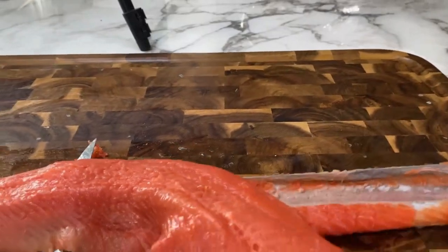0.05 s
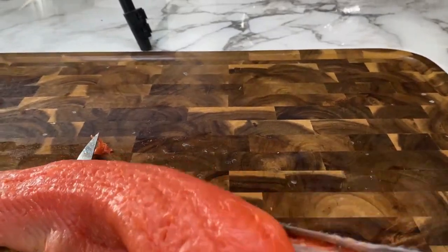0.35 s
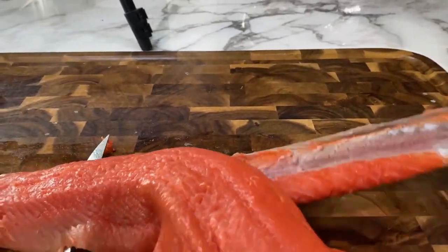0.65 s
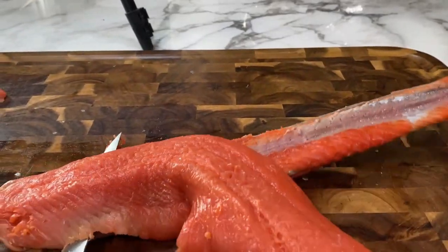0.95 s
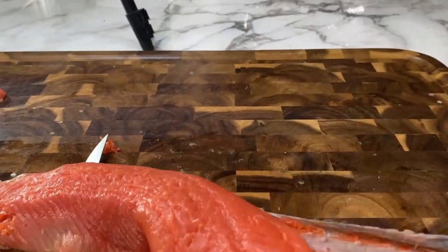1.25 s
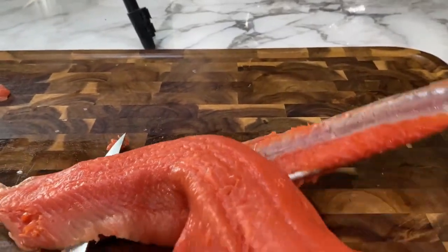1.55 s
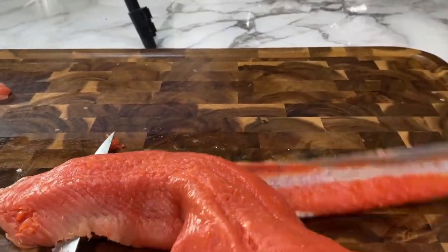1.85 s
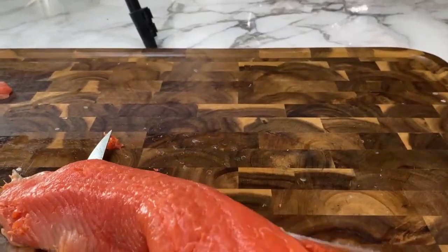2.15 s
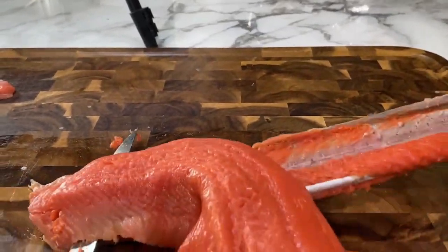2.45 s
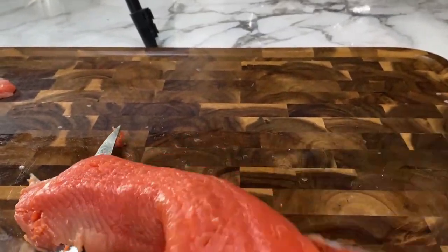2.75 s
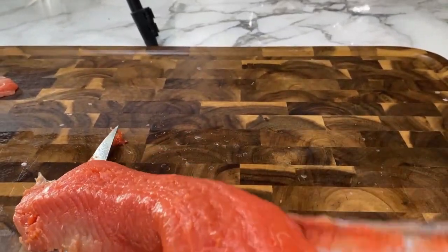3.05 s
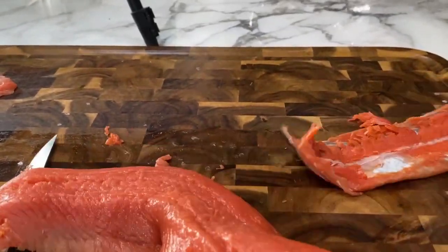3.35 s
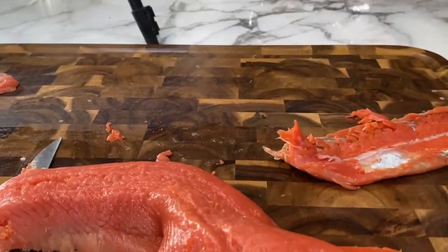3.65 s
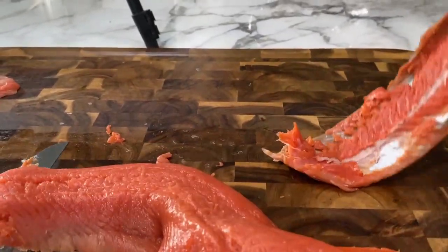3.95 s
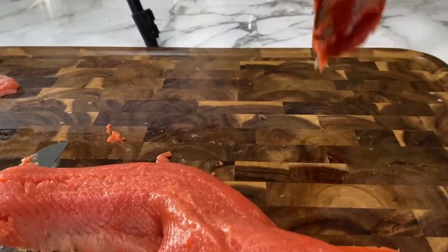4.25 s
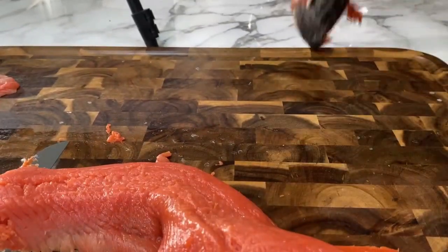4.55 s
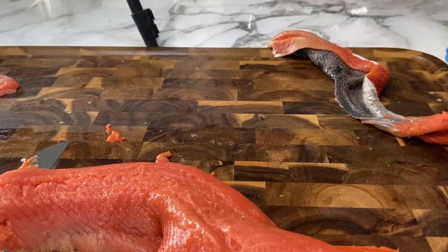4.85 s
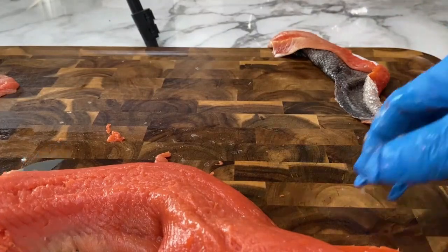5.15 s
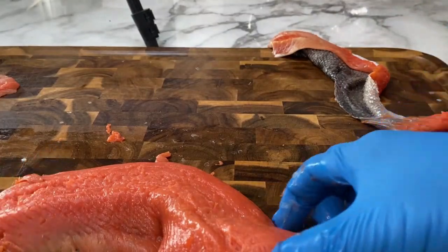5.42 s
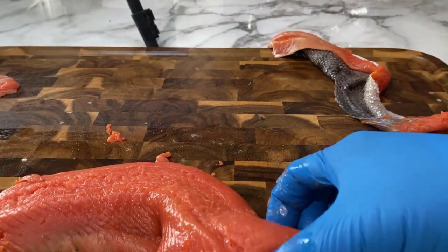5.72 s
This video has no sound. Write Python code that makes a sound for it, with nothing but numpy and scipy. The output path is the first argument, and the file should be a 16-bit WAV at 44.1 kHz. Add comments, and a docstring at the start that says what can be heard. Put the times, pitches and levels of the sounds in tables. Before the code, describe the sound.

A microphone sits close to a wooden cutting board in a kitchen, with a fan's low, steady rush behind and a slight room echo. From the start, salmon skin is rocked against a knife in soft, uneven strokes: wet fibres crackle and squelch, juice pops, and the board rumbles dully. Sharper little tears come at about 1.5 and 2.3 seconds. From 3.1 to 3.6 seconds the last strip rips free, louder and sizzling. A lull follows. At about 4.7 seconds, after a few wet pops, the skin lands with a sharp slap, the loudest sound, and a quickly fading fizz. The steel blade slides lightly around 5 seconds and gives a short ringing scrape at 5.2. A gloved hand squelches softly on the flesh near 5.5 seconds, and the knife clicks twice in quick succession against the board at 5.7.

```python
"""A kitchen, one microphone close to a wooden board. A salmon skin is rocked against a knife: wet
fibres part in strokes, juice pops, and the last strip rips free. The skin is dropped with a slap and
a fading fizz; the steel blade scrapes briefly and clicks twice as it is handled.
A fan runs behind it all, and farther off the walls answer softly."""
import sys
import numpy as np
from scipy import signal
from scipy.fft import rfft, irfft, next_fast_len
from scipy.io import wavfile
from scipy.ndimage import map_coordinates

SR = 44100
rng = np.random.default_rng(int(sys.argv[2]) if len(sys.argv) > 2 else 0)


def wav_record(signal):
    """Record a signal, one row per channel, as 16-bit PCM in the file named by sys.argv[1]."""
    frames = np.transpose(np.atleast_2d(signal))
    bounded = np.clip(frames, -1, 1)
    # unit amplitude maps onto the largest positive 16-bit level
    quanta = np.round(bounded * 32767).astype(np.int16)
    wavfile.write(sys.argv[1], SR, quanta)


N = 254898
TOP_HZ = 15950  # upper edge of the band
TYPICAL_DB = -41.5  # a typical stroke
# the hands first lean on the board: t/s, level/dB, rise/s, hold/s, fade/s
LEANING = (0.1, -46, -7, 0.5, 0.15)


def amp(db):
    """Decibels to gain."""
    return 10 ** (np.asarray(db) / 20)


def unit(x):
    """Scale to rms 1."""
    return x / np.sqrt(np.mean(x ** 2) + 1e-20)


def along(points, hz):
    """Read (f/Hz, value) points on a log frequency axis."""
    f, v = np.transpose(points)
    return np.interp(np.log(hz + 1), np.log(f + 1), v)


def wobble(rate):
    """A smooth random curve, rate knots a second."""
    knots = rng.standard_normal(int(N * rate / SR) + 4)
    return map_coordinates(knots, [np.arange(N) * rate / SR])


def swell(s, db, rise, hold, fade, depth_db=20.5):
    """Gain that climbs to db at time s, holds and fades; one rise or fade time covers depth_db."""
    t = np.arange(N) / SR - s
    away = np.maximum(-t / rise, 0) + np.maximum((t - hold) / fade, 0)
    return amp(db - depth_db * np.minimum(away, 6) ** 1.05)


def filtered(x, response):
    """x through a complex response of frequency."""
    size = next_fast_len(len(x) + 8192)
    return irfft(rfft(x, size) * response(np.fft.rfftfreq(size, 1 / SR)), size)[:len(x)]


def coloured(x, spectrum):
    """x shaped by (f/Hz, level/dB) points, at rms 1."""
    return unit(filtered(x, lambda hz: amp(along(spectrum, hz))))


def resonant(x, peaks):
    """x through (f/Hz, width/Hz, level/dB) resonances."""
    return filtered(x, lambda f: sum(amp(db) * 1j * f * width / (hz * hz - f * f + 1j * f * width)
                                     for hz, width, db in peaks))


def causal(x, spectrum, size=2048):
    """x through a minimum-phase filter of energy 1, shaped by (f/Hz, level/dB) points."""
    cepstrum = irfft(np.log(amp(along(spectrum, np.fft.rfftfreq(size, 1 / SR)))))
    fold = np.r_[1, np.full(size // 2 - 1, 2), np.zeros(size // 2)]
    response = irfft(np.exp(rfft(cepstrum * fold)))
    return signal.fftconvolve(x, response / np.linalg.norm(response))[:len(x)]


def add(track, s, sound):
    """Mix a sound into the track at time s."""
    part = track[round(s * SR):][:len(sound)]
    part += sound[:len(part)]


def strew(grains, when):
    """Mix each row of grains in at its fraction of the scene's length, at rms 1."""
    where = (when * N).astype(int)[:, None] + np.arange(grains.shape[1])
    return unit(np.bincount(where.ravel(), grains.ravel(), N)[:N])


def fan():
    """The fan behind the board: a low rush of air, a hiss and a thin whine."""
    # spectra of the moving air: f/Hz, level/dB
    rush_spectrum = [(20, -50), (33, -29), (43, -8), (76, -1), (130, -2.5), (172, 1), (205, -1.5),
                     (240, -1), (400, -4.5), (470, -5), (660, -11), (880, -16), (1100, -25), (2000, -51)]
    hiss_spectrum = [(500, -15), (1000, 2), (1700, 0.5), (2500, -6.5), (4000, -9), (6000, -11),
                     (10000, -15.5), (13000, -25), (16000, -34)]
    rush = amp(-47.5) * coloured(rng.standard_normal(N), rush_spectrum)
    hiss = amp(-59.5) * coloured(rng.standard_normal(N), hiss_spectrum)
    whine = amp(-69) * unit(resonant(rng.standard_normal(N), [(4400, 130, 0)]))
    return rush + hiss + whine


def pull():
    """Strength of the pull on the skin and of its sizzle; overlapping strokes add in power."""
    # rocking on the knife, the last rip (3.2 s), skin dragged off (from 3.7 s), glove on flesh (5.4 s):
    # t/s, level/dB, rise/s, hold/s, fade/s, sizzle re level/dB
    strokes = [ (0.01, -50.5, 0.1, 0.016, 0.14, -10), (0.289, -51.5, 0.05, 0.085, 0.17, -1.5),
               (0.594, -49.5, 0.17, 0.029, 0.16, -0.5), (0.719, -44, 0.017, 0.016, 0.14, 1.5),
               (0.862, -51, .2, .04, .05, -4), (1.153, -45.5, 0.12, 0.05, 0.064, -1.5),
               (1.436, -49, 0.062, 0.074, .05, 0.5), (1.507, -43.5, 0.018, 0.029, 0.26, -5),
               (1.948, -44.5, .12, 0.053, .11, -4), (2.114, -61.5, .05, .12, .04, -2.5),
               (2.281, -43, 0.024, 0.034, 0.056, -0.5), (2.329, -37, 0.037, 0.019, 0.092, -6),
               (2.756, -46, 0.19, 0.018, 0.18, -4), (3.157, -34, 0.078, 0.049, 0.032, -3),
               (3.244, -32, 0.021, 0.047, .08, -2), (3.36, -34.5, 0.059, 0.058, .17, 0),
               (3.494, -46, 0.046, 0.06, 0.066, -4), (3.655, -67.5, 0.18, 0.39, .1, 4),
               (4.185, -59.5, 0.037, 0.0052, 0.0081, 10), (4.576, -48.5, 0.056, 0.088, .05, 0.5),
               (5.4, -55, 0.16, 0.053, 0.16, -3), (5.522, -54, 0.045, .03, 0.17, -5), ]
    swells = np.array([swell(*stroke[:5]) for stroke in strokes])
    sizzle = amp([stroke[5] for stroke in strokes])[:, None]
    return np.linalg.norm(swells, axis=0), np.linalg.norm(swells * sizzle, axis=0)


def board_rumble(force):
    """The board rumbles dully under the leaning hands and each pull."""
    spectrum = [(30, -38), (55, -14), (80, 1.5), (130, -10), (220, -13), (500, -31), (2000, -56)]
    load = np.hypot(swell(*LEANING), amp(-18) * force)
    return load * coloured(rng.standard_normal(N), spectrum)


def fibres(rate, spread_db, life_s, hiss):
    """Tiny snaps of random pitch and size, rate a second, over a smooth wet hiss."""
    count, t = int(rate * N / SR), np.arange(SR // 600) / SR
    when, pitch, chance = rng.random((count, 3)).T
    size = amp(spread_db * np.minimum(-np.log(1 - chance), 3))
    snaps = size[:, None] * np.sin(2 * np.pi * TOP_HZ * pitch[:, None] * t) * np.exp(-t / life_s)
    return strew(snaps, when) + hiss * rng.standard_normal(N)


def pocket(x, width_hz):
    """The wet pocket between flesh and blade: its resonance moves as the flesh lifts off."""
    # path of the resonance: t/s, f/Hz
    path = [(.75, 3130), (1.17, 2630), (1.97, 2470), (3.17, 2770), (3.2, 3860), (5.6, 3540)]
    centre = np.interp(np.arange(N) / SR, *np.transpose(path))
    steps = np.linspace(centre.min(), centre.max(), 5)  # crossfade between five steady resonances
    return unit(sum(np.interp(centre, steps, share) * resonant(x, [(hz, width_hz, 0)])
                    for hz, share in zip(steps, np.eye(len(steps)))))


def bubbles(rate, centre_hz, scatter, life_s):
    """Tiny air pockets in the juice ring for some cycles, rising in pitch."""
    count, t = int(rate * N / SR), np.arange(SR // 100) / SR
    when, pitch, size = rng.random((count, 3)).T
    hz = centre_hz * np.exp(scatter * (2 * pitch[:, None] - 1))
    envelope = amp(-14 * size[:, None]) * t * np.exp(-t / life_s)
    return strew(envelope * np.sin(2 * np.pi * hz * t * (1 + 6 * t)), when)


def slicing(force, sizzle):
    """Fibres part along the edge; the pull catches and slips, and the board carries the low part."""
    # spectra of the tearing flesh, its sizzle and the board beneath: f/Hz, level/dB
    flesh_spectrum = [(600, -46), (1300, -0.5), (2000, 0.5), (3500, 2), (5500, 2.5), (7500, -17),
                      (16000, -50)]
    sizzle_spectrum = [(3000, -42), (5500, -7), (7000, 2.5), (9800, 0), (12000, -4.5), (14000, -11.5),
                       (16000, -22)]
    board_spectrum = [(40, -29), (80, -3), (200, 3.5), (450, 4.5), (800, -0.5), (1350, 0.5), (2000, -10.5),
                      (4000, -36)]
    tear = fibres(rate=5000, spread_db=5, life_s=0.00029, hiss=0.7)
    squelch = pocket(fibres(rate=2800, spread_db=7.5, life_s=0.00023, hiss=0.86), width_hz=750)
    juice = bubbles(rate=220, centre_hz=3020, scatter=0.457, life_s=0.0022)
    wet = amp(-2) * force * unit(coloured(tear, flesh_spectrum) + amp(1.7) * squelch + 0.39 * juice)
    bright = amp(-4.5) * sizzle * coloured(tear, sizzle_spectrum)
    load = np.hypot(amp(-51) * (force / amp(TYPICAL_DB)) ** 0.92, amp(-8.5) * swell(*LEANING))
    catch = amp(1.77 * wobble(70) + 1.2 * wobble(250))
    return catch * (wet + bright + load * coloured(tear, board_spectrum))


def pop(hz, cycles, spray):
    """A film of juice snaps: a soft-edged cycle or two of tone and a little spray, peak 1."""
    t = np.arange(SR // 80) / SR
    age = t * hz / cycles
    tone = np.sin(2 * np.pi * hz * t) * age * np.exp(1 - age)
    burst = rng.standard_normal(len(t)) * np.exp(-t / 0.00079)
    mist = filtered(burst, lambda f: 1 / (1 + 1.1j * (f / hz - hz / (f + 1))) ** 2)
    sound = tone + spray * mist / np.abs(mist).max()
    return sound / np.abs(sound).max()


def wet_pops(force, work_s=4.1, rate=81, low_hz=3500, high_hz=10700):
    """Single loud pops and, while the skin is worked, small ones that grow with the pull."""
    # the loudest snaps of juice, and at 5.644 s a sharp tick of the blade as it is handled: t/s, level/dB, f/Hz
    loud_pops = [(0.2709, -30, 6660), (0.285, -29, 7800), (0.3736, -23.5, 2970), (0.466, -38, 6600),
                 (0.4854, -32.5, 7260), (0.519, -34, 7200), (0.6363, -33, 6300), (0.787, -34, 6400),
                 (0.876, -31, 9350), (0.9107, -36, 3210), (0.9783, -35.5, 9100), (1.361, -39, 2700),
                 (1.391, -35.5, 8800), (1.4177, -25, 2460), (1.5062, -23.5, 7400), (2.049, -32, 3860),
                 (2.1378, -38, 8350), (2.202, -34.5, 8900), (2.215, -35, 5900), (2.2546, -33, 7900),
                 (2.2907, -26, 6100), (2.4002, -19.5, 8300), (2.5014, -31, 6300), (2.9509, -36, 2950),
                 (3.158, -23, 5150), (3.1991, -15, 7160), (3.218, -27, 1630), (3.535, -20.5, 7000),
                 (3.565, -26.5, 5730), (4.5214, -35, 7530), (4.573, -25, 6600), (4.608, -26, 3150),
                 (4.659, -23, 6640), (5.0033, -38.5, 2776), (5.512, -23, 3700), (5.6438, -23.5, 7060)]
    out = np.zeros(N)
    for s, db, hz in loud_pops:
        add(out, s, amp(db) * pop(hz, cycles=0.91, spray=1))
    for when, size, pitch in rng.random((int(rate * work_s), 3)):
        s = when * work_s
        effort = force[int(s * SR)] / amp(TYPICAL_DB)
        gain = amp(-43.5 + 13.5 * size ** 2) * effort ** 0.33
        hz = low_hz + (high_hz - low_hz) * np.sqrt(pitch)
        add(out, s, gain * pop(hz, cycles=0.54, spray=0.33))
    return filtered(out, lambda hz: 1 / (1 + (hz / 12500) ** 8))  # soft flesh dulls the top


def skin_gives():
    """A run of fibres lets go at once and the crackle dies away; near the end, a short wet squelch does the
    same."""
    # sudden rips, and at 5.512 s a short wet squelch: t/s, level/dB, t60/s
    rips = [(.717, -51, 0.18), (1.506, -30.5, 0.2), (2.284, -43, .1), (2.331, -32, 0.17),
            (3.246, -27.3, 0.25), (3.296, -22.5, 0.067), (3.331, -33, 0.041), (5.512, -38, 0.073)]
    envelope, t = np.zeros(N), np.arange(SR // 3) / SR
    for s, db, t60 in rips:
        add(envelope, s, amp(db - 60 * t / t60))
    crackle = fibres(rate=5700, spread_db=2.5, life_s=0.00055, hiss=0.8)
    spectrum = [(100, 4), (900, 7.5), (2000, -6), (3300, 5.5), (6000, -2.5), (10000, 1.5), (16000, -31)]
    return amp(-6) * envelope * coloured(crackle, spectrum)


def slap(spray_db=-9):
    """Each wet fold pushes out a pulse of air and a spray of juice, and rings the board briefly."""
    # folds of the dropped skin land one after another: t/s, level/dB, brightness/Hz, spray t60/s
    folds = [(4.6748, -13, 7000, .006), (4.6761, -6.2, 1100, .012), (4.6777, -10, 5000, .009),
             (4.6795, -11, 9000, .009), (4.686, -25, 3500, .02), (4.6935, -22, 6000, .015)]
    # spectrum of the wet smack: f/Hz, level/dB
    smack_spectrum = [(60, -12), (150, -1), (500, 1.5), (1000, 2.5), (1800, 0), (3300, 9), (4500, -1.5),
                      (7000, 3.5), (8800, 10.5), (10500, -1.5), (14000, -4), (16000, -27)]
    # modes of the board: f/Hz, width/Hz, level/dB
    board_modes = [(1050, 220, -5), (1780, 220, 2), (2450, 270, 4), (3100, 280, 2), (3420, 260, -1),
                   (4430, 300, -8), (5700, 280, -2)]
    out, t = np.zeros(N), np.arange(SR // 20) / SR
    for s, db, bright_hz, t60 in folds:
        age = 2 * np.pi * bright_hz * t
        push = np.diff(age * np.exp(-age), append=0)
        spray = filtered(rng.standard_normal(len(t)), lambda f: 1 / (1 + 1j * f / bright_hz))
        add(out, s, amp(db) * (push / push.max() + amp(spray_db - 60 * t / t60) * unit(spray)))
    return amp(2.5) * (causal(out, smack_spectrum) + resonant(out, board_modes))


def spatter(s=4.678, db=-33.5, t60=0.31):
    """The wet skin settles after the slap in a fading fizz."""
    t = np.arange(N) / SR - s
    spectrum = [(100, -9), (400, 2.5), (1200, 0), (2200, -1), (3300, 5.5), (5000, 1.5), (9000, -5),
                (12000, -14), (16000, -32)]
    fizz = coloured(fibres(rate=4500, spread_db=1, life_s=0.00029, hiss=0.93), spectrum)
    return fizz * (t > 0) * amp(db - 60 * np.abs(t) / t60)


def blade_scrape(grip=0.29, bite_db=3.5):
    """The blade judders as it slides; the harder it bears, the more its modes sing."""
    # a light slide, then one bearing down: t/s, level/dB, rise/s, hold/s, fade/s
    slides = [(5.049, -53, 0.15, 0.065, 0.12), (5.179, -34, 0.024, 0.033, 0.012)]
    # modes of the sliding blade: f/Hz, width/Hz, level/dB
    steel_modes = [(2350, 125, 0.5), (3150, 52, -7), (4010, 70, -8), (4280, 80, 2), (5080, 210, -3),
                   (6300, 220, -5), (7630, 130, -2.5), (8560, 100, -4), (8800, 70, -5), (9900, 130, -4.5),
                   (11260, 130, -8), (12800, 270, -13), (14200, 130, -14.5)]
    press, t = np.zeros(N), np.arange(N) / SR
    for s, db, rise, hold, fade in slides:
        progress = np.clip((t - s) / hold, 0, 1)
        press += swell(s, db, rise, hold, fade) * amp(bite_db * (progress - 0.5))
    judder = amp(2.8 * wobble(220))
    slips = judder * fibres(rate=3100, spread_db=1.5, life_s=0.0001, hiss=0.4)
    ring = unit(sum(resonant(slips, [mode]) * amp(4.6 * wobble(70)) for mode in steel_modes))
    grit = coloured(slips, [(1200, -16), (2500, -6), (5000, 0), (10500, -4.5), (14000, -13),
                            (16000, -22)])
    return press * ((press / press.max()) ** grip * ring + amp(-2.5) * grit)


def knife_clicks():
    """Steel meets wood: a crack, a damped ring and a small knock."""
    # contacts with the board, in two clusters: t/s, steel level/dB, knock level/dB
    contacts = [(5.6919, -24.5, -43), (5.697, -26, -45), (5.7169, -34, -46.5), (5.7243, -25.5, -51),
                (5.729, -44.5, -42)]
    # modes of the struck knife: f/Hz, level/dB, t60/s
    knife_modes = [(926, -11, 0.048), (1310, -11, 0.046), (2110, -32, .04), (3356, -18.5, 0.096),
                   (4400, -10, 0.074), (5540, -5, 0.03), (6570, -1.5, 0.018), (7900, -2, 0.019),
                   (9130, 1.5, .018), (10400, -2, 0.022), (11630, -18, .018), (13120, -22, .02),
                   (14270, -22, .025)]
    crack_spectrum = [(1000, -21.5), (4000, 1), (9500, 2.5), (12000, -7), (16000, -26)]
    steel, wood, t = np.zeros(N), np.zeros(N), np.arange(SR // 4) / SR
    for s, db, knock_db in contacts:
        ring = sum(amp(level + rng.normal(0, 2) - 60 * t / t60) * np.sin(2 * np.pi * hz * t)
                   for hz, level, t60 in knife_modes)
        crack = causal(rng.standard_normal(len(t)) * amp(-60 * t / 0.0077), crack_spectrum)
        add(steel, s, amp(db) * (0.43 * ring + 0.6 * crack))
        add(wood, s, amp(knock_db - 60 * t / 0.053) * rng.standard_normal(len(t)))
    return steel + causal(wood, [(100, -3), (600, -8), (1200, -2), (2000, -11), (8000, -31.5)])


def kitchen_walls(x, delay_s=0.006):
    """The walls' answer reaches the microphone just after the direct sound; the treble dies first."""
    # reverberation of the kitchen: f/Hz, t60/s
    decay_times = [(150, 0.62), (1000, 0.33), (3500, 0.22), (8000, 0.25), (15000, 0.16)]
    hz, t, noise = signal.stft(rng.standard_normal(SR // 2), SR, nperseg=256)
    decay = amp(-60 * t / along(decay_times, hz)[:, None])
    tail = signal.istft(noise * decay, SR, nperseg=256)[1]
    tail = np.pad(tail / np.linalg.norm(tail), (round(delay_s * SR), 0))
    return signal.fftconvolve(x, tail)[:N]


def scene():
    """Fish, knife and board up close, walls and fan behind, in mono."""
    force, sizzle = pull()
    fish = slicing(force, sizzle) + skin_gives() + wet_pops(force) + spatter()
    smack = slap()
    knife = blade_scrape() + knife_clicks()
    walls = kitchen_walls(amp(-15.5) * fish + amp(-17) * smack + amp(-12) * knife)
    return (fish + smack + knife + walls + fan() + board_rumble(force))[None]


def record(dry):
    """The camera's microphone cuts the bass below 38 Hz and keeps nothing above the band's edge."""
    return np.array([filtered(channel, lambda hz: (hz < TOP_HZ) * hz ** 4 / np.hypot(hz ** 4, 38 ** 4))
                     for channel in dry])


dry = scene()
out = record(dry)
wav_record(out)
```